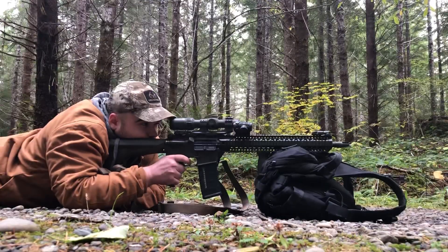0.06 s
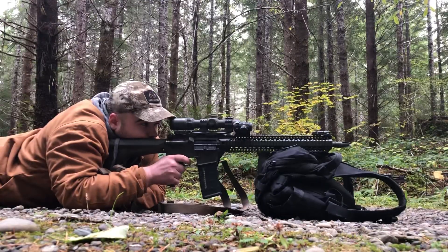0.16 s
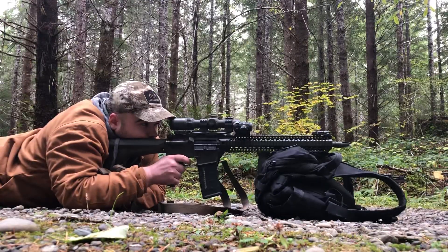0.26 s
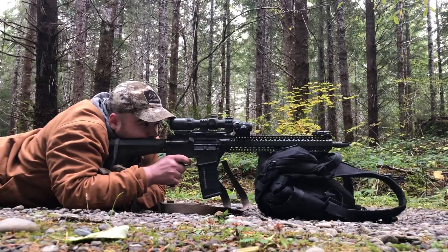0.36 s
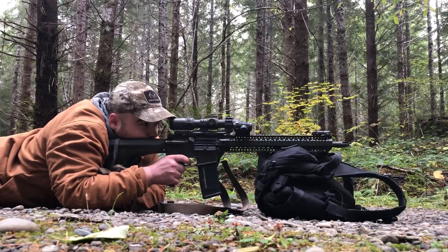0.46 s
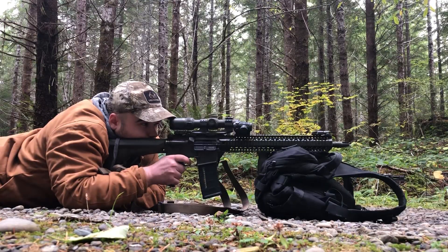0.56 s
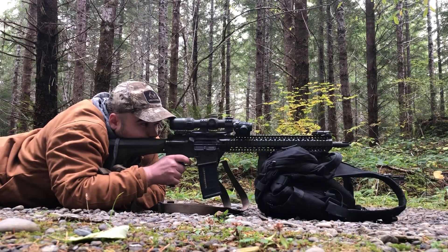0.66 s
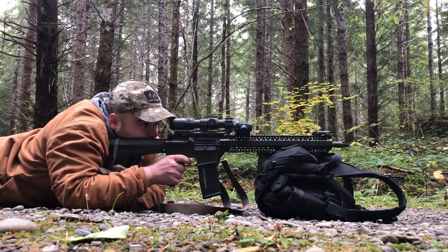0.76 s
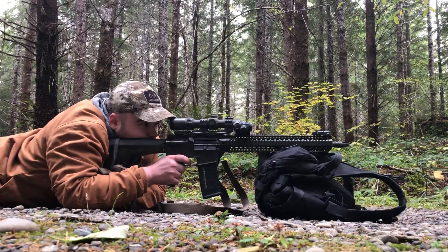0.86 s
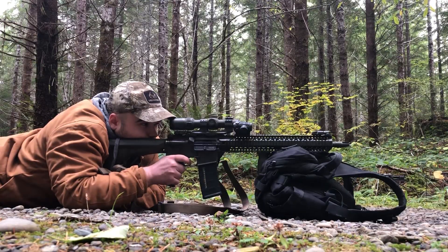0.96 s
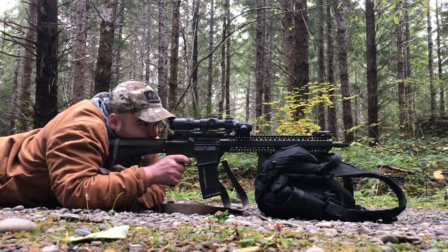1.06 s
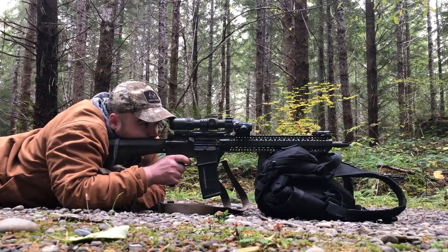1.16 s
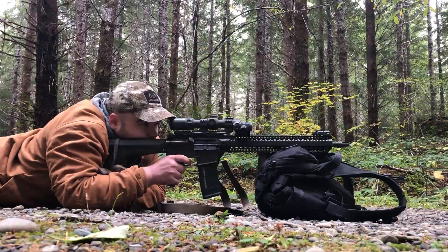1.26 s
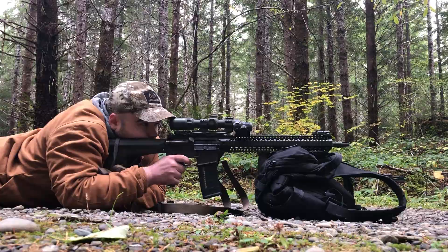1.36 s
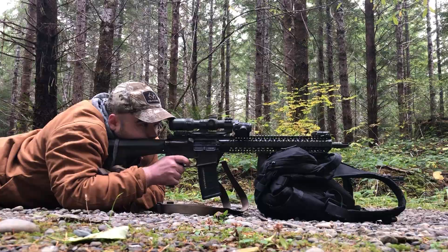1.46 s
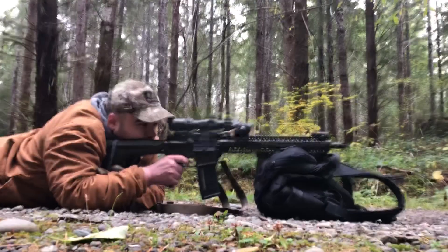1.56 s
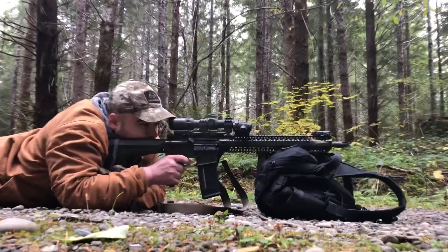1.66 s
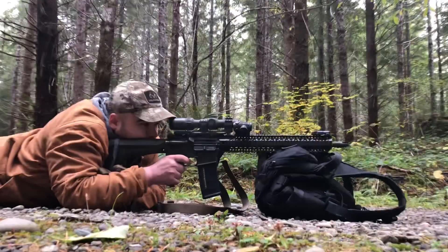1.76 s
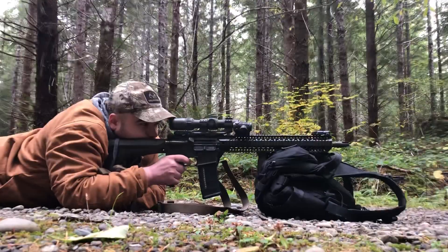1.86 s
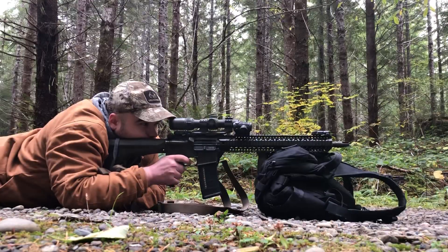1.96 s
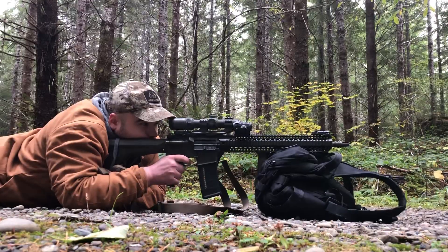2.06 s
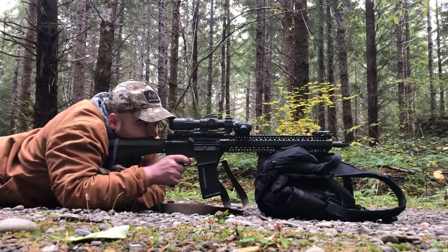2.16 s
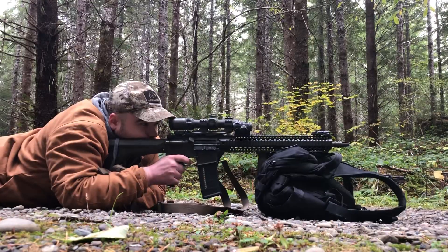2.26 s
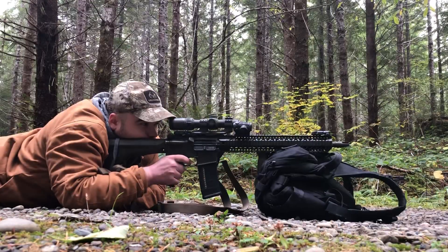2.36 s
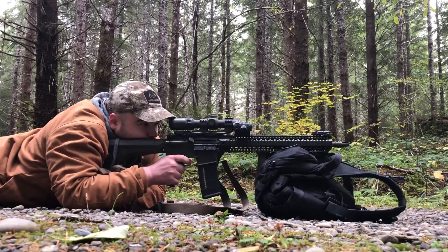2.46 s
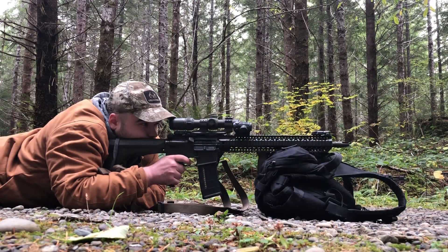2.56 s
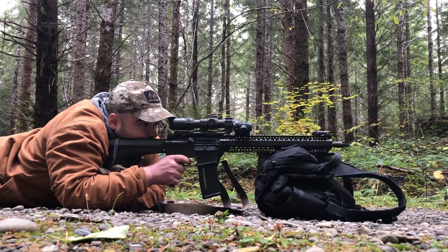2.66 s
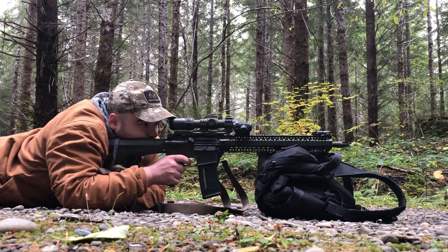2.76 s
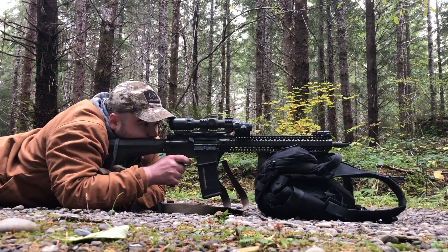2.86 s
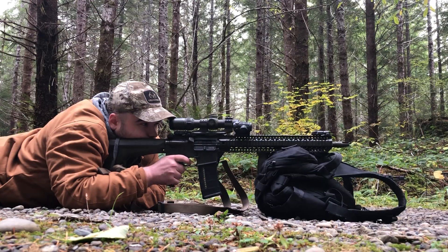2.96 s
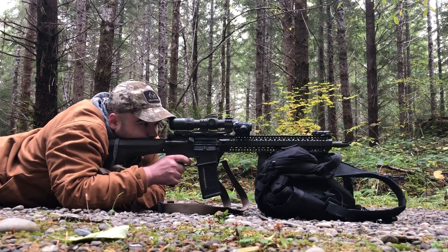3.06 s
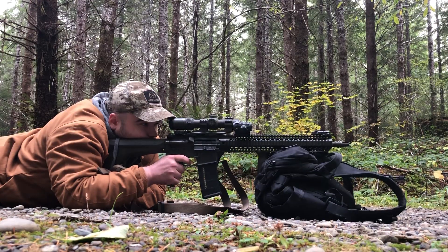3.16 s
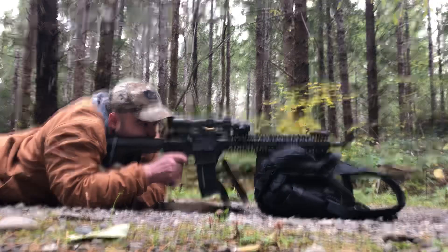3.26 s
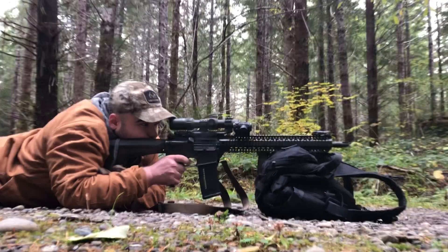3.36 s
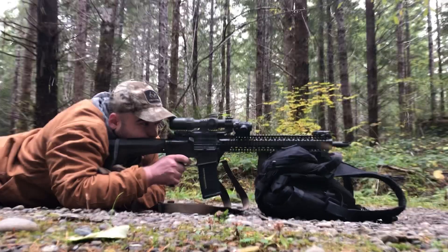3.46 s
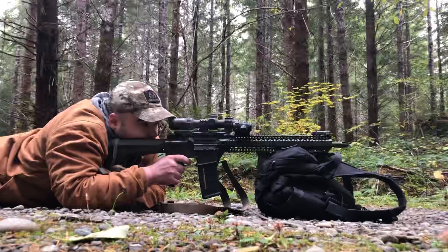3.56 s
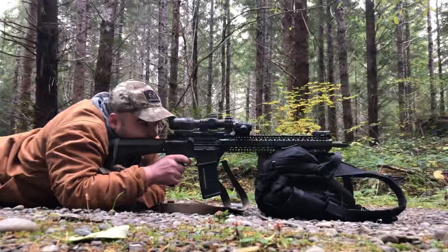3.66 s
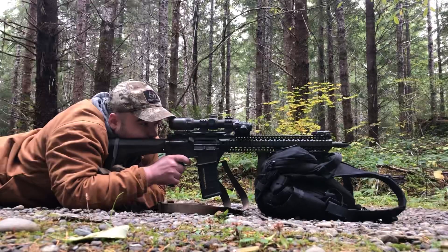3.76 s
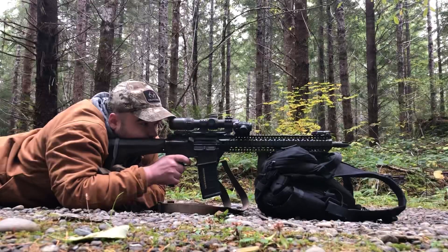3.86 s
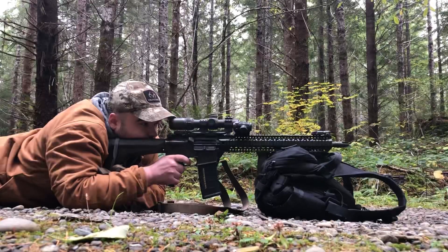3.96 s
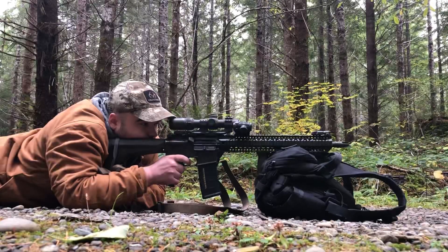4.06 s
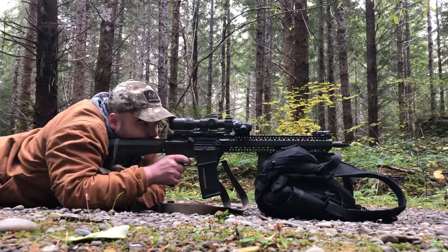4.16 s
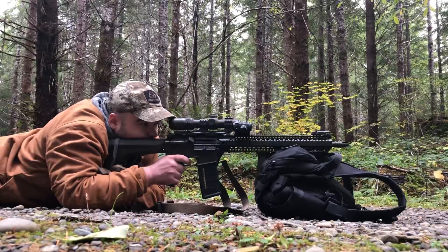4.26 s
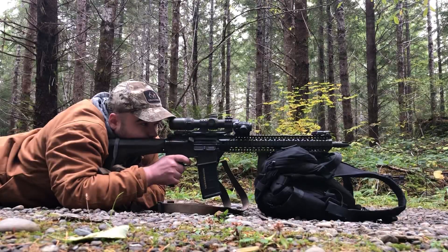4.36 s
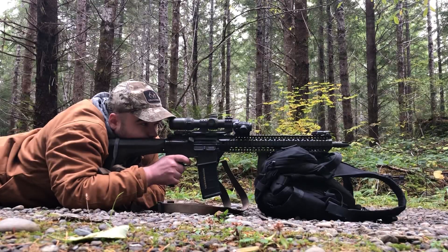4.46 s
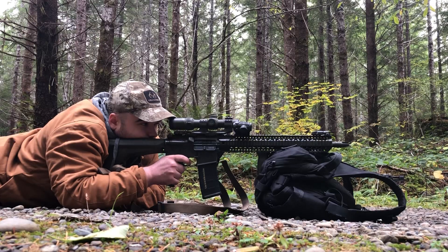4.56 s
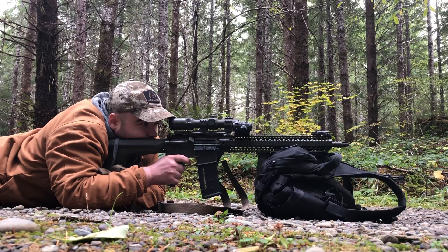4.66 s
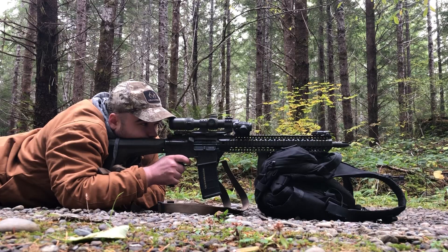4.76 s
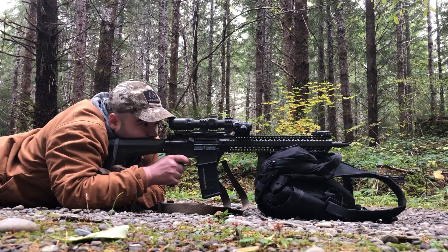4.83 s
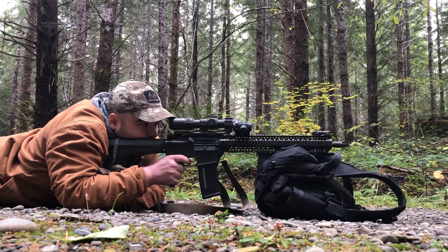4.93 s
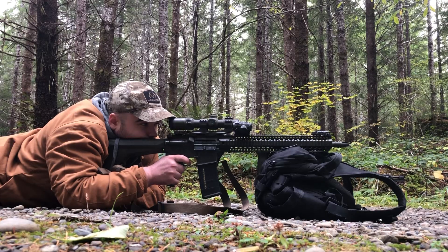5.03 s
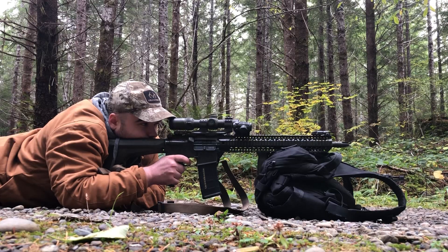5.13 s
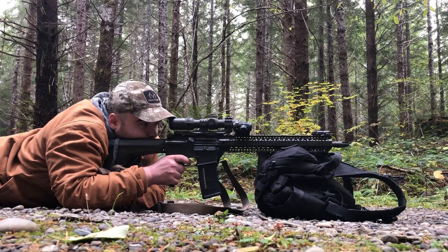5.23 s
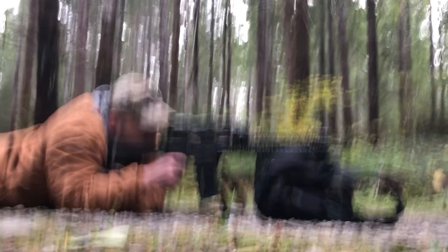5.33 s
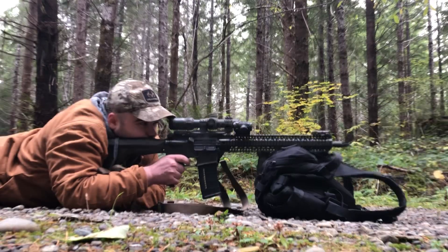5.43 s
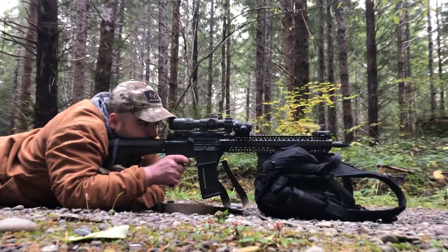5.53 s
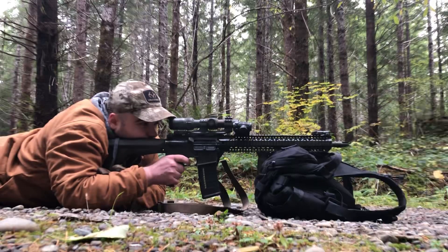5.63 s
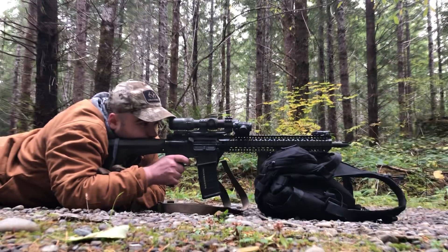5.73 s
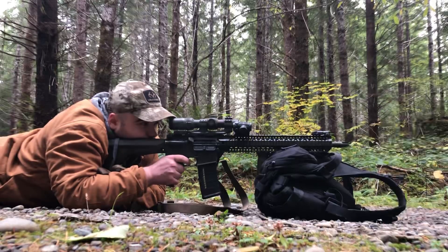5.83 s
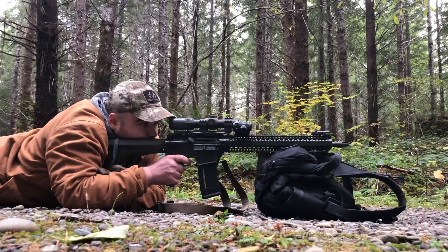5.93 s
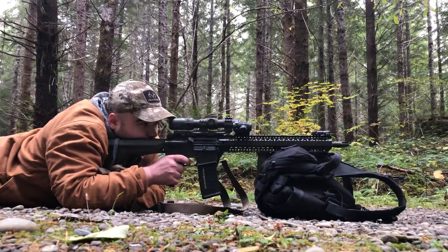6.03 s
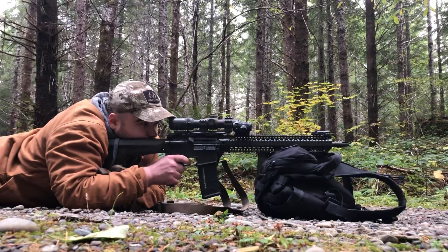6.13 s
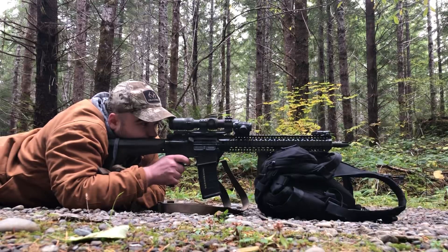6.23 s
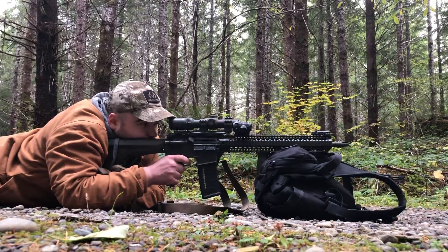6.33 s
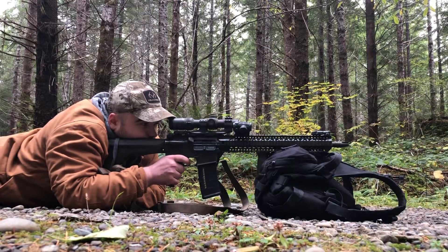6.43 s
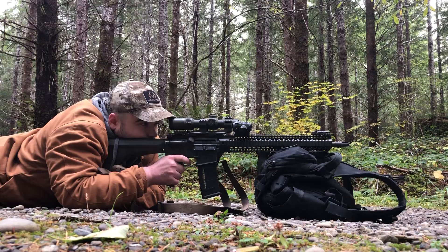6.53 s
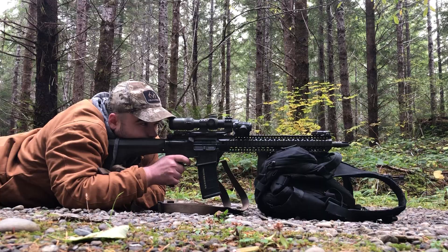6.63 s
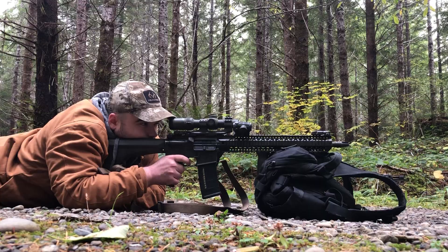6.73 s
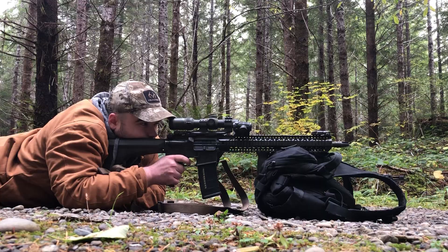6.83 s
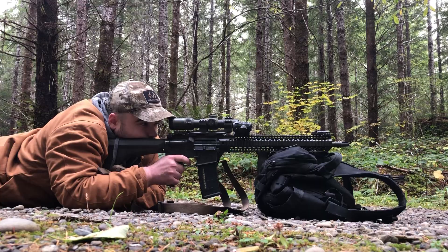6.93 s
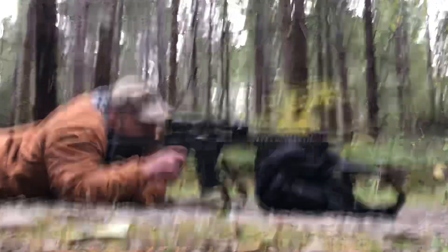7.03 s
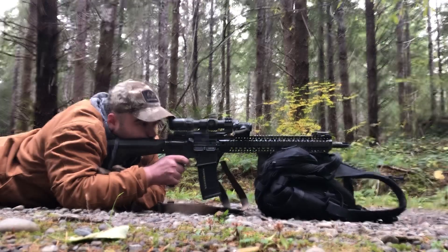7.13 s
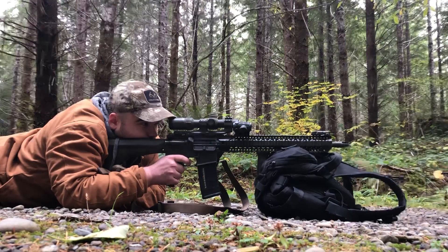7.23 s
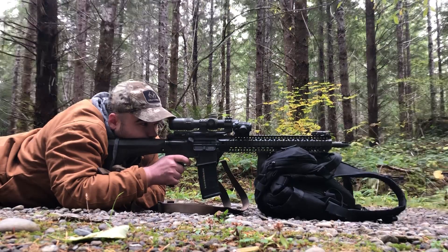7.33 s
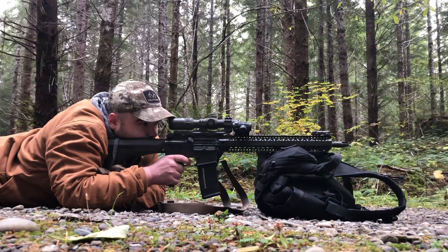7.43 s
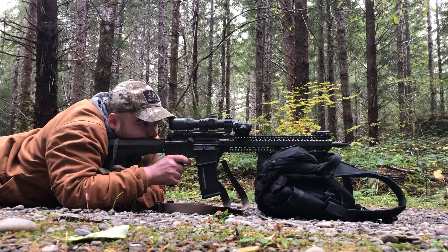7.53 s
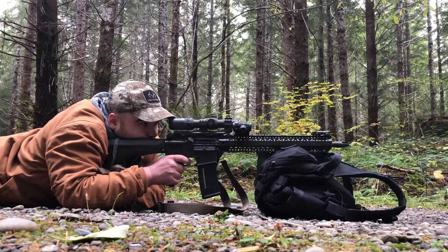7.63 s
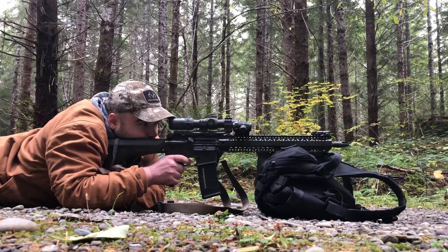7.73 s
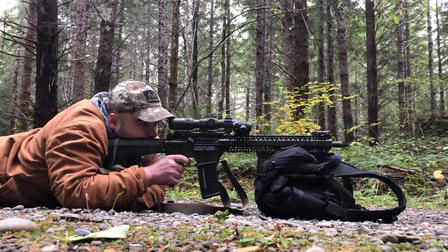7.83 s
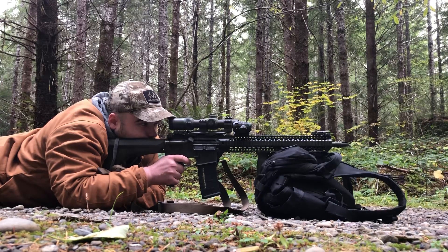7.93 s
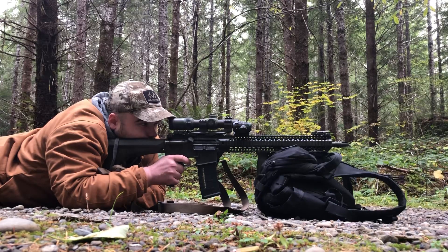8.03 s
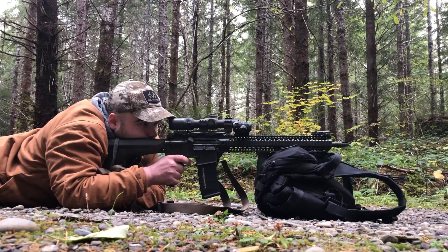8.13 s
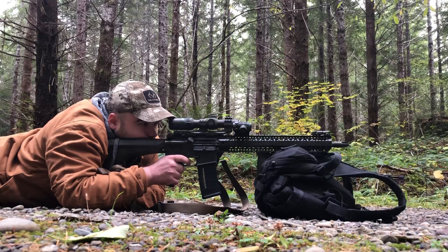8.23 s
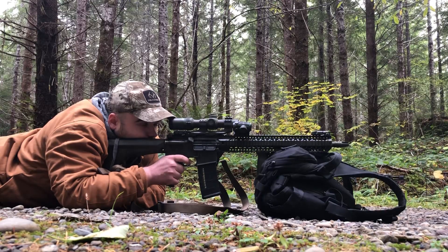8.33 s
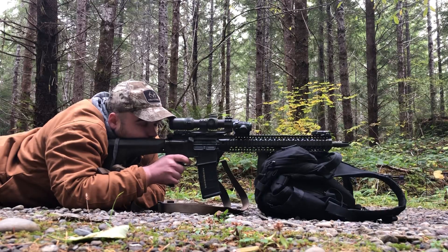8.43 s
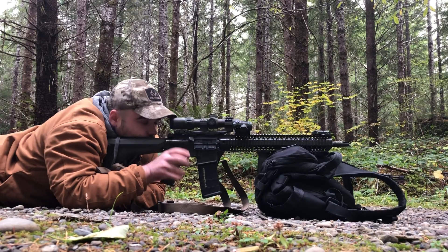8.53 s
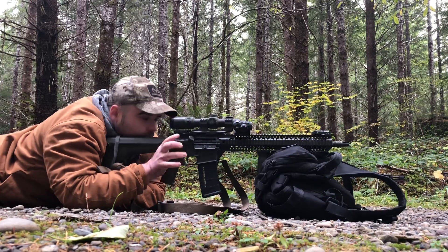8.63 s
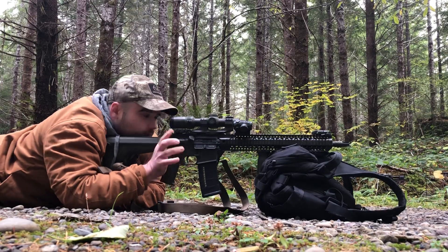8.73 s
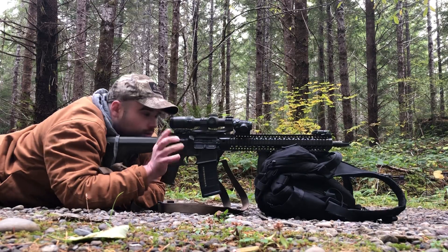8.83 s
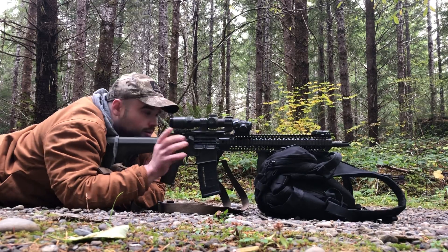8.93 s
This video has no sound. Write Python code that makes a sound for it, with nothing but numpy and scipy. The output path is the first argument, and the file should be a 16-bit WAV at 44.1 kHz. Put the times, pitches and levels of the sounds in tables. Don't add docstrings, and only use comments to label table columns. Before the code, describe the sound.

A rifle fires four spaced shots in a forest, each with rolling echo, ringing brass on gravel and a distant steel plate's clang.

```python
import sys
import numpy as np
from scipy import signal
from scipy.fft import rfft, irfft
from scipy.io import wavfile
from scipy.ndimage import uniform_filter1d

SR = 44100
rng = np.random.default_rng(int(sys.argv[2]) if len(sys.argv) > 2 else 0)


def dump_mix(stems):
    frames = np.atleast_2d(stems).T
    limited = np.clip(frames, -1, 1)
    pcm = np.round(limited * 32767).astype(np.int16)
    wavfile.write(sys.argv[1], SR, pcm)


def decibels_to_gain(level_db):
    exponent = np.asarray(level_db, float) / 20
    return 10 ** exponent


N = 396455

# pitch_hz, level_db per Hz
AIR_COLOUR = [(25, -62), (70, -41), (115, -20), (170, -5), (380, 0), (600, -8), (1000, -12), (2100, -19.5),
              (2900, -39), (4500, -64), (16000, -68)]
AIR_DB = -51

# pitch_hz, level_db per Hz; then pitch_hz, t60_s
NEAR_COLOUR = [(30, -24), (170, -1), (300, -10), (550, -9), (1000, -2), (1800, 0), (2600, -5.5),
               (4700, -10), (6400, -12), (9000, -17), (15200, -23), (16800, -44)]
NEAR_T60 = [(200, .6), (500, .35), (1000, .2), (4000, .18), (7000, .32), (14000, .3)]
TREES_COLOUR = [(30, -28), (170, -4.5), (250, -.5), (400, -4), (608, -8), (780, -8), (1030, -9),
                (1700, -10), (2740, -14), (4410, -11), (6500, -15), (15200, -28), (16800, -46)]
TREES_T60 = [(60, .6), (250, .66), (1000, .66), (4000, .64), (8000, .52), (15000, .33)]
VALLEY_COLOUR = [(30, -42), (110, -20), (170, -4), (404, -1), (798, -11), (994, -8), (1700, -11),
                 (3000, -16.5), (4600, -14.5), (6500, -18.5), (8700, -28), (11000, -50), (16000, -90)]
VALLEY_T60 = [(60, 1.5), (300, 2.5), (1000, 3.5), (2500, 3.5), (4700, 2.1), (6500, 1.7), (10000, 1.1)]
NEAR_DB, TREES_DB, VALLEY_DB = -14.7, -18.2, -34.4
SWELL_S = .11
PATCHY_DB, SLAPS_DB = 2.0, 1.1

# start_s, thud_db, clang_db, flex_along_db, flex_across_db
PLATE_HITS = [
    (.393, -24, -55, -75, -63),
    (2.571, -28, -61, -75, -80),
    (4.281, -28, -58, -55, -75),
    (6.386, -27, -57, -59, -67),
    (8.077, -25, -55, -55, -76),
]
# pitch_hz, level_db, t60_s
PLATE_CLANG = [(6620, -14, .38), (6650, -18, .28), (3380, -6.5, .4), (3395, -12, .6), (3700, -16, .15),
               (6060, -17, .3), (7640, -26, .26)]
PLATE_ALONG = [(5259, -3, .33), (4942, -9, .45)]
PLATE_ACROSS = [(5690, -9, .8), (5692.2, -11, 1.0)]

# start_s, level_db, touch
HANDLING = [
    (3.152, -58, "take-up"),
    (8.44, -84, "sleeve"),
    (8.442, -76, "tick"),
    (8.464, -77, "creak"),
    (8.476, -77, "creak"),
    (8.597, -77, "tick"),
    (8.62, -86, "sleeve"),
    (8.648, -80, "tick"),
    (8.831, -67, "thumb"),
]
TOUCHES = {"tick": (6000, 14000, .001, .01), "take-up": (2500, 14000, .001, .01),
           "creak": (9500, 12500, .002, .02), "sleeve": (5000, 15000, .15, .5),
           "thumb": (2500, 14500, .012, .012)}
SAFETY_S = 8.8557
# level_db, low_hz, high_hz, held_s, t60_s
SAFETY = [
    (-22, 9500, 14500, .0002, .006),
    (-32, 2600, 9000, .0003, .01),
    (-37.5, 1000, 1900, .003, .025),
    (-43, 500, 1000, .002, .015),
    (-57, 2500, 15000, .012, .02),
    (-70, 3000, 15000, .045, .22),
]

# (bending_hz, mouth_hz, second_mouth_hz), then bounces of
# start_s, gravel_db, bending_db, mouth_db, second_mouth_over_first_db (which way the tube lands)
CASES = [
    ((10915, 14950, 15400), [(1.82, -58, -55, -47, -2), (1.991, -72, -58, -52, 1), (2.068, -74, -64, -72, -3), (2.095, -78, -66, -70, -5), (2.122, -80, -65, -72, 14)]),
    ((10840, 14955, 15160), [(3.5714, -66, -46, -45, 6), (3.7115, -59, -65, -51, 8), (3.7474, -64, -70, -50, 8), (3.848, -78, -71, -68, 6), (3.935, -76, -72, -76, 5)]),
    ((10760, 14790, 15120), [(5.679, -52, -39, -39, 17), (5.913, -51, -46, -47, 0), (5.992, -70, -66, -60, 10), (6.088, -60, -70, -54, 14)]),
    ((10910, 14876, 15390), [(7.332, -70, -47, -52, 9), (7.363, -80, -70, -40, -20), (7.443, -79, -61, -57, 2), (7.534, -73, -75, -80, 0), (7.596, -82, -80, -64, -12)]),
]
CASE_T60_S = (.17, .2, .1)

# blast_s, level_db, bolt_shuts_after_s, bolt_db
SHOTS = [
    (-.68, 0, .072, 0),
    (1.4968, 0, .0717, 0),
    (3.2155, 0, .075, 0),
    (5.325, 0, .075, 0),
    (7.012, 0, .072, 0),
]
# after_blast_s, level_db, puff
ACTION = [
    (-.030, -72, "sear"),
    (-.0222, -34, "hammer"),
    (-.0222, -44, "springs"),
    (-.0105, -29, "hum"),
    (-.0074, -21, "spit"),
    (-.008, -21.5, "kick"),
]
# after_blast_s, level_db, puff
BLAST = [
    (-.014, -28, "jolt"),
    (-.006, -18.5, "bore"),
    (-.006, -25, "burn"),
    (0, -13, "crack"),
    (0, -13, "slap"),
    (.007, -21, "brake"),
    (0, -17, "body"),
    (.002, -13.5, "roar"),
]
PUFFS = {"sear": (8000, 12000, .001, .004), "hammer": (400, 4000, .003, .08),
         "springs": (4500, 15000, .004, .16), "hum": (1500, 3200, .005, .02),
         "spit": (8500, 15500, .0015, .007), "kick": (200, 650, .009, .02), "jolt": (55, 300, .030, .06),
         "bore": (1500, 2100, .006, .012), "burn": (2100, 3300, .006, .02),
         "crack": (4500, 13000, .002, .05), "slap": (1200, 2600, .003, .012),
         "brake": (5500, 7500, .008, .06), "body": (600, 1900, .014, .03), "roar": (2300, 5000, .007, .02)}
# puff_low_hz, likeness 0-1
ALIKE = [(600, .85), (1500, .72), (5000, .6)]
# after_shut_s, level_db, low_hz, high_hz, held_s, t60_s
BOLT = [
    (.001, -24, 5800, 6800, .002, .015),
    (0, -21, 8500, 15000, .0015, .01),
]
# pitch_hz, level_db, t60_s
BARREL = [(8570, -33, .55), (8535, -38, .4), (8610, -42, .5), (6300, -36, .12)]
# after_blast_s, level_db, length_s
TRUNKS = [(.0055, -8, .0011), (.0135, -9, .0004), (.024, -14, .0007), (.032, -15, .0003),
          (.0335, -7, .0011), (.041, -16, .0012), (.0525, -14, .0009), (.0575, -16, .0008),
          (.062, -17, .0012), (.0665, -17, .0008), (.0725, -21, .001), (.098, -18, .0014),
          (.109, -18, .0009), (.122, -16, .001), (.131, -15, .0012)]


def read(points, hz):
    f, value = np.transpose(points)
    return np.interp(np.log(hz + 1), np.log(f + 1), value)


def add(mix, s, sound):
    at = round(s * SR)
    part = mix[max(at, 0):][:len(sound) + min(at, 0)]
    part += sound[max(-at, 0):][:len(part)]


def blend(same, fresh, likeness):
    return likeness * same + np.sqrt(1 - likeness ** 2) * fresh


def burst(db, low_hz, high_hz, held, t60):
    t = np.arange(SR // 5) / SR
    band = signal.butter(3, [low_hz, min(high_hz, 20000)], "band", fs=SR, output="sos")
    shape = decibels_to_gain(db - 60 * np.maximum(t - held, 0) / t60)
    width = np.sqrt(2 * (high_hz - low_hz) / SR)
    return signal.sosfilt(band, shape * rng.standard_normal(len(t))) / width


def ring(modes, rise=.0005):
    t = np.arange(SR // 2) / SR
    sines = sum(decibels_to_gain(db - 60 * t / t60) * np.sin(2 * np.pi * hz * t) for hz, db, t60 in modes)
    return sines * (1 - np.exp(-t / rise))


def wave(db, length):
    u = np.arange(-2 * length, 3 * length, 1 / SR) / length
    return decibels_to_gain(db) * np.cos(2.6 * u - .2) * np.exp(-(u / 1.3) ** 2)


def air():
    noise = rfft(rng.standard_normal(N))
    rumble = irfft(noise * decibels_to_gain(read(AIR_COLOUR, np.fft.rfftfreq(N, 1 / SR))), N)
    drift = uniform_filter1d(rng.standard_normal(N), size=400)
    return decibels_to_gain(AIR_DB + 1.5 * drift / drift.std()) * rumble / rumble.std()


def reflections():
    strength_db = 3.0 * np.minimum(rng.exponential(1, 3 * SR), 5)
    taps = rng.standard_normal(3 * SR) * decibels_to_gain(strength_db)
    return signal.stft(taps / taps.std(), SR, nperseg=512, noverlap=256)


def echo_power(hz, colour, level_db, t60, after):
    tint = decibels_to_gain(2 * read(colour, hz)[:, None])
    return tint / np.mean(tint) * decibels_to_gain(2 * (level_db - 60 * after / read(t60, hz)[:, None]))


def forest():
    hz, after, same_trees = reflections()
    near = (after > .010) * echo_power(hz, NEAR_COLOUR, NEAR_DB, NEAR_T60, after)
    trees = echo_power(hz, TREES_COLOUR, TREES_DB, TREES_T60, after - SWELL_S)
    valley = echo_power(hz, VALLEY_COLOUR, VALLEY_DB, VALLEY_T60, after)
    swell = 1 - np.exp(-(after / SWELL_S) ** 6)
    size = np.sqrt(near + swell * (trees + valley))
    size *= decibels_to_gain(1.8 * rng.standard_normal(len(after)) * np.exp(-hz[:, None] / 1200))
    patches = uniform_filter1d(rng.standard_normal(size.shape), size=2, axis=0)
    patches = uniform_filter1d(patches, size=4, axis=1)
    slaps = uniform_filter1d(rng.standard_normal(size.shape), size=50, axis=0)
    size *= decibels_to_gain(PATCHY_DB * patches / patches.std() + SLAPS_DB * slaps / slaps.std() - 1.0)
    likeness = np.exp(-(hz[:, None] / 8500) ** 1.3 * (1 + 3 * after))
    out = np.zeros(N)
    for s, db, *_ in SHOTS:
        echo = blend(same_trees, reflections()[2], likeness) * size
        add(out, s, decibels_to_gain(db) * signal.istft(echo, SR, nperseg=512, noverlap=256)[1])
    return out


def plate():
    out = np.zeros(N)
    for s, thud_db, clang_db, along_db, across_db in PLATE_HITS:
        add(out, s - .002, burst(thud_db - 15, 1700, 3200, .001, .008))
        add(out, s - .001, burst(thud_db - 14, 900, 1600, .002, .014))
        add(out, s - .002, burst(thud_db - 36, 3300, 7500, .001, .006))
        add(out, s, -wave(-1.5 + thud_db, .0007))
        add(out, s + .012, burst(clang_db + 5.5, 3500, 6500, .002, .025))
        add(out, s + .012, burst(clang_db + 8, 600, 1600, .002, .03))
        for blow_db, modes in ((clang_db, PLATE_CLANG), (along_db, PLATE_ALONG), (across_db, PLATE_ACROSS)):
            add(out, s + .012, decibels_to_gain(blow_db) * ring(modes, rise=.006))
        add(out, s + .02, burst(thud_db - 37, 900, 2800, .04, .3))
    return out


def handling():
    out = np.zeros(N)
    for s, db, touch in HANDLING:
        add(out, s, burst(db, *TOUCHES[touch]))
    add(out, SAFETY_S, sum(burst(*part) for part in SAFETY))
    return out


def brass():
    out = np.zeros(N)
    for rings_hz, bounces in CASES:
        for s, gravel_db, bend_db, mouth_db, lean_db in bounces:
            levels_db = (bend_db, mouth_db, mouth_db + lean_db)
            for hz, db, t60 in zip(rings_hz, levels_db, CASE_T60_S):
                modes = [(hz, db + .6, t60), (hz - 45, db - 7, 1.3 * t60), (hz + 85, db - 10, t60)]
                add(out, s, ring(modes, rise=.002))
            add(out, s, burst(gravel_db + 8, 2500, 15000, .0004, .006))
    return out


def rifle():
    out = np.zeros(N)
    usual_blast = [burst(db, *PUFFS[puff]) for _, db, puff in BLAST]
    for s, db, shut, bolt_db in SHOTS[1:]:
        for after, part_db, puff in ACTION:
            add(out, s + after, burst(db + part_db, *PUFFS[puff]))
        for (after, part_db, puff), same in zip(BLAST, usual_blast):
            likeness = np.clip(read(ALIKE, PUFFS[puff][0]), 0, 1)
            fresh = burst(part_db, *PUFFS[puff])
            add(out, s + after, decibels_to_gain(db) * blend(same, fresh, likeness))
        for after, *shape in BOLT:
            add(out, s + shut + after, decibels_to_gain(bolt_db) * burst(*shape))
        for after, trunk_db, length in TRUNKS:
            add(out, s + after - 2 * length, wave(db + trunk_db, length))
        add(out, s, decibels_to_gain(db) * ring(BARREL, rise=.004))
    return out


def scene():
    return (air() + forest() + plate() + handling() + brass() + rifle())[None]


def roll_off(x):
    return signal.sosfilt(signal.butter(12, 16980, fs=SR, output="sos"), x)


def record(dry):
    top = 1.2
    limited = top * np.tanh(dry / top)
    bass_cut = signal.butter(2, 70, "high", fs=SR, output="sos")
    edge = signal.firwin(255, 16130, window=("kaiser", 7), fs=SR)
    mix = signal.oaconvolve(signal.sosfilt(bass_cut, limited), edge[None], "same")
    return roll_off(mix)


dry = scene()
out = record(dry)
dump_mix(out)
```